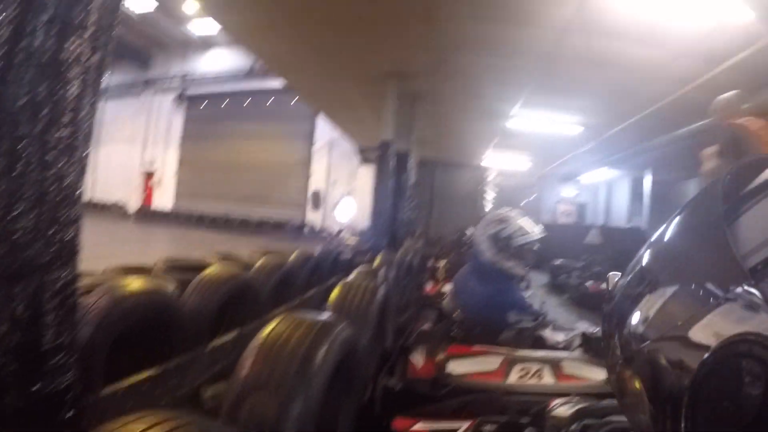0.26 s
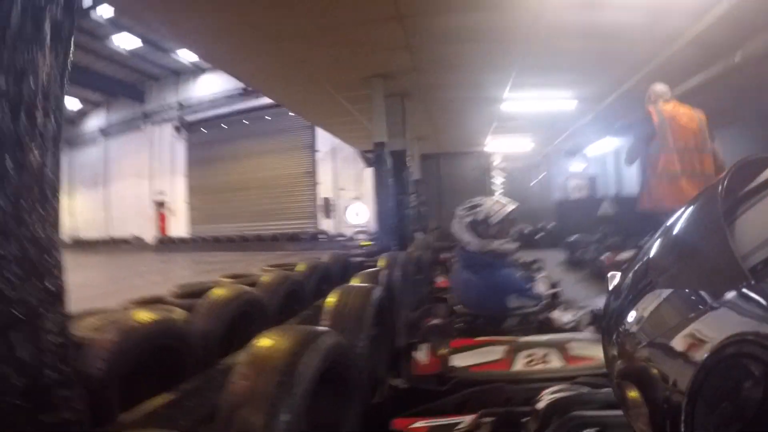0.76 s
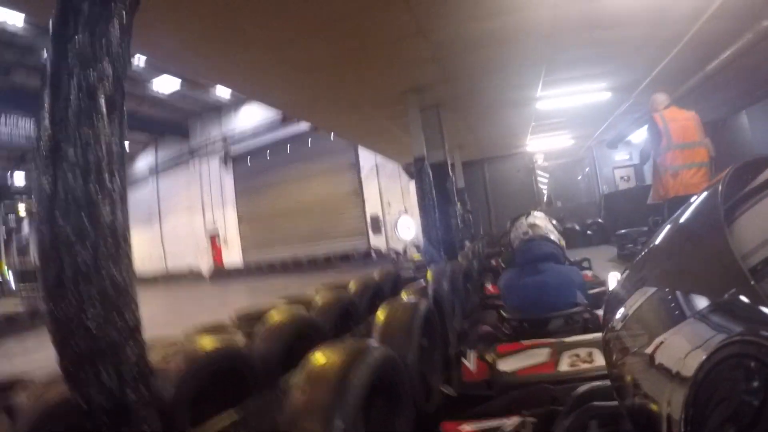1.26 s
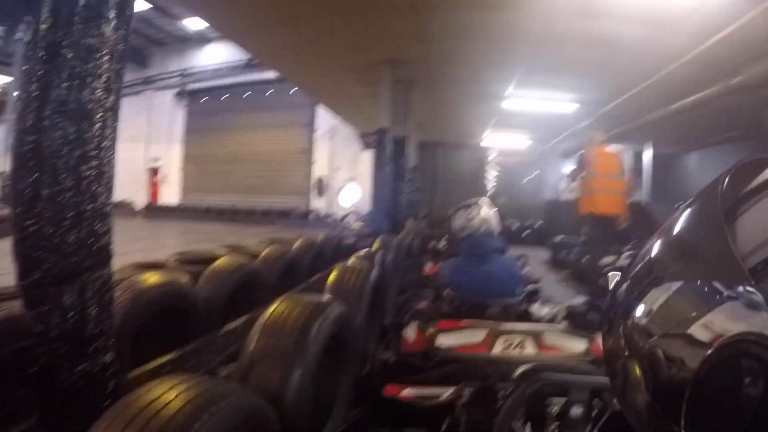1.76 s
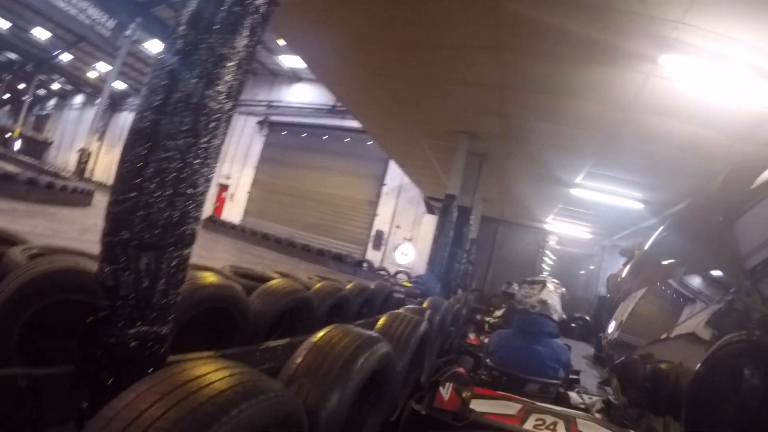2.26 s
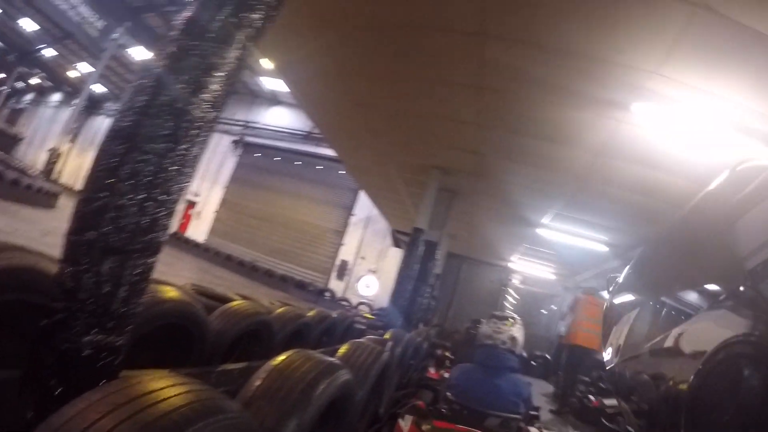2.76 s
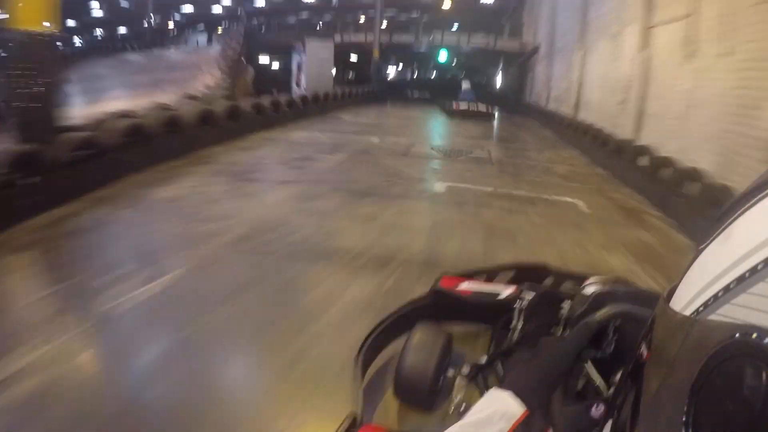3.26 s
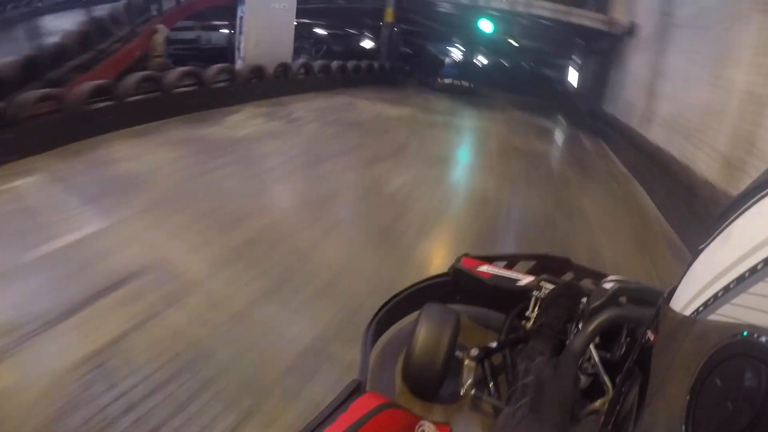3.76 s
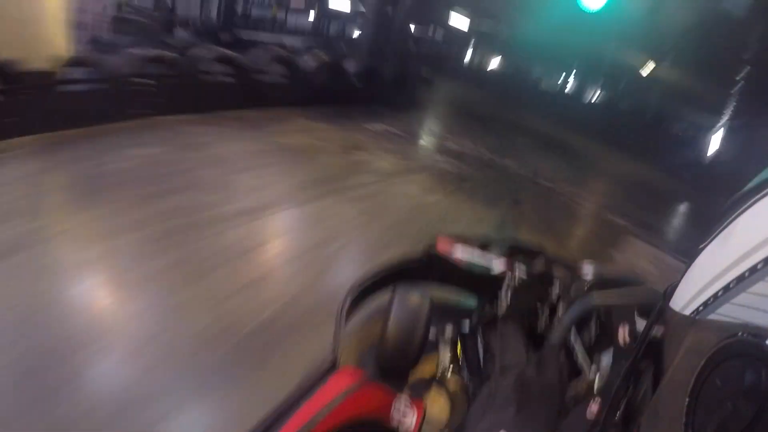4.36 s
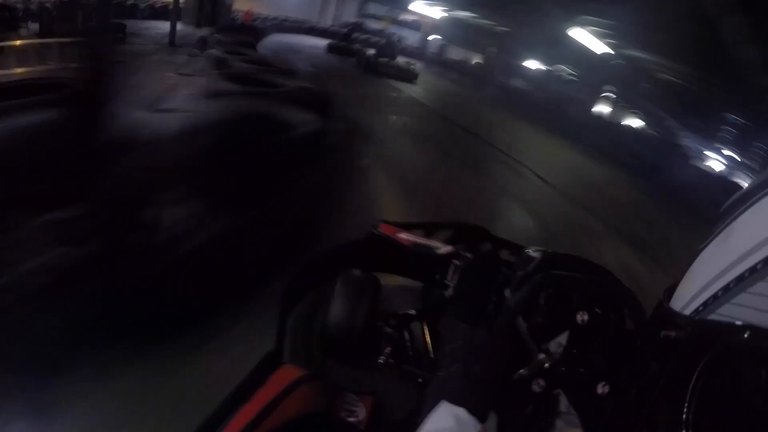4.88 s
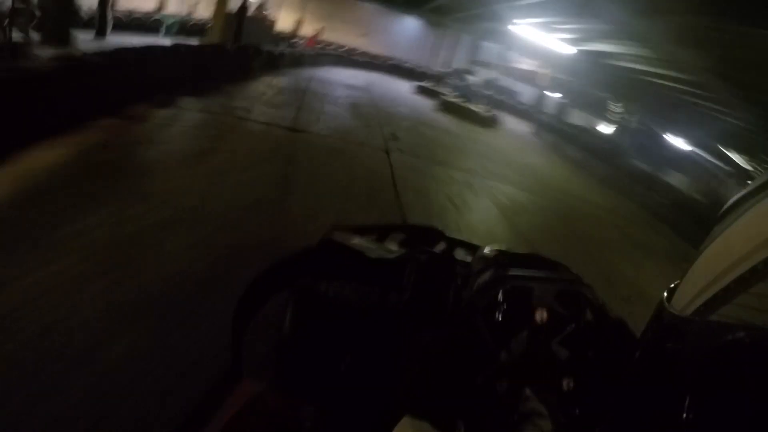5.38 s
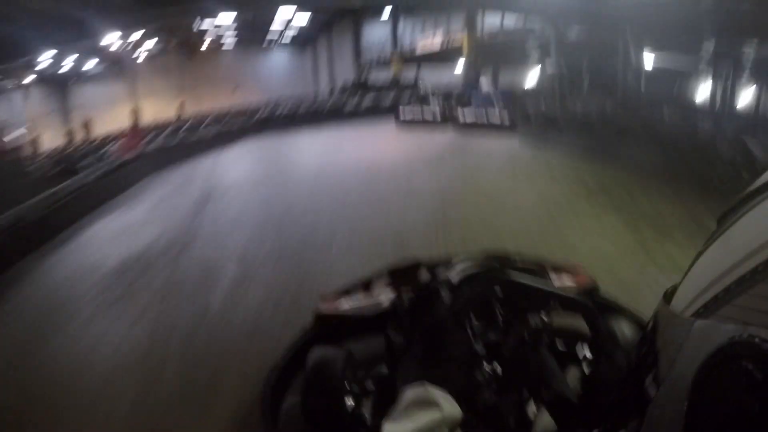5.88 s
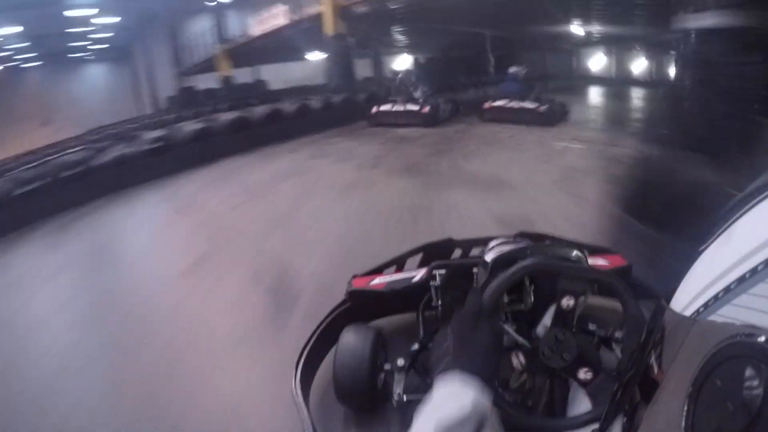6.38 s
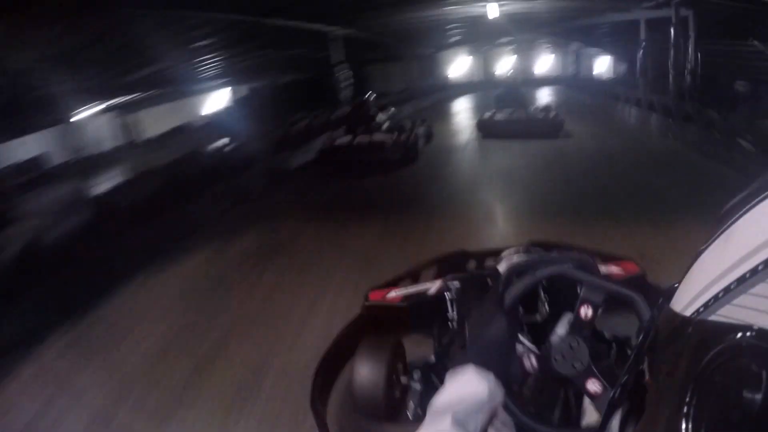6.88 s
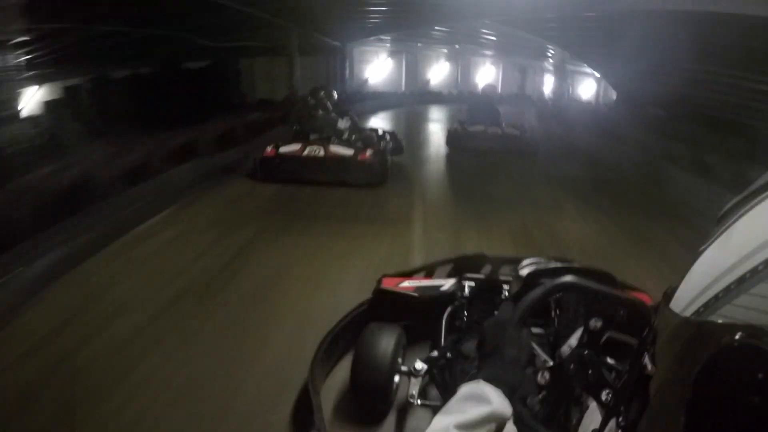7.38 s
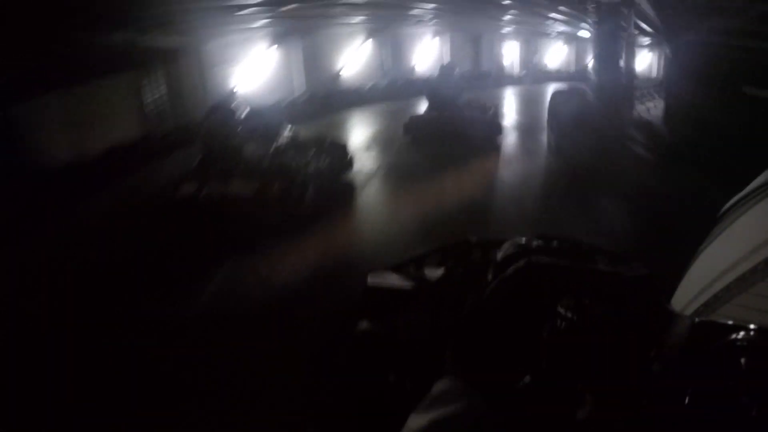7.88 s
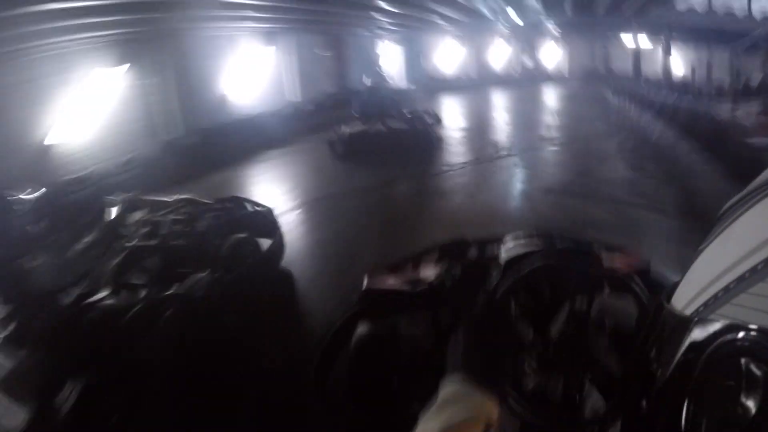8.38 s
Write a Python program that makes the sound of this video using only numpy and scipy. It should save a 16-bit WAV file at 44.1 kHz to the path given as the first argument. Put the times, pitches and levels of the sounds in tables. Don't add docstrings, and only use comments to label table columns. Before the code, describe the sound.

Muffled pit lane hum with bumps and a brief air hiss, then suddenly a droning kart at speed, wind whistling and tyres chirping.

```python
import sys
import numpy as np
from scipy import signal
from scipy.fft import rfft, irfft
from scipy.io import wavfile
from scipy.ndimage import uniform_filter1d

SR = 44100
rng = np.random.default_rng(int(sys.argv[2]) if len(sys.argv) > 2 else 0)


def field_ratio(decibels):
    return 10 ** (np.asarray(decibels, dtype=float) / 20)


def pcm_store(signal):
    levels = np.round(np.clip(np.atleast_2d(signal), -1, 1) * 32767)
    wavfile.write(sys.argv[1], SR, levels.astype(np.int16).T)


N = 381024
CUT_S = 3.141


def evened(x):
    return x / np.sqrt(np.mean(x ** 2) + 1e-20)


def curves(rows):
    s, *columns = np.transpose(rows)
    return [np.interp(np.arange(N) / SR, s, c) for c in columns]


def add(mix, start_s, sound):
    part = mix[round(start_s * SR):][:len(sound)]
    part += sound[:len(part)]


def drift(hz):
    size = N // 128 + 1
    z = rfft(rng.standard_normal(size))
    bin_hz = np.arange(len(z)) * SR / N
    slow = irfft(z * np.exp(-(bin_hz / hz) ** 2), size)
    return np.interp(np.linspace(0, size - 1, N), np.arange(size), evened(slow))


def noise(colour, patchy_db, flicker_db, size=N):
    frames, hz = size // 256 + 5, np.fft.rfftfreq(1024, 1 / SR)
    real, imag, patches = rng.standard_normal((frames, 513, 3)).T
    patches = uniform_filter1d(patches, 14, axis=0)
    patches = evened(uniform_filter1d(patches, 12, axis=1))
    flicker = evened(uniform_filter1d(rng.standard_normal(frames), size=4))
    f, db = np.transpose(colour)
    shape_db = np.interp(np.log(hz + 1), np.log(f + 1), db)[:, None]
    z = (real + 1j * imag) * field_ratio(shape_db + patchy_db * patches + flicker_db * flicker)
    return evened(signal.istft(z, nperseg=1024, noverlap=768)[1][:size])


def whistle(hz, width_hz, size=N):
    coarse = np.arange(0, size + 8, 8)
    r = np.exp(-8 * np.pi * width_hz / SR)
    slow = signal.lfilter([1], np.convolve([1, -r], [1, -r]), rng.standard_normal((2, len(coarse))))
    a, b = (np.interp(np.arange(size), coarse, part) for part in slow)
    phase = 2 * np.pi * np.cumsum(hz * np.ones(size)) / SR
    return evened(a * np.cos(phase) + b * np.sin(phase))


# pitch_hz, level_db (per Hz)
HALL_COLOUR = [(150, -37), (250, -10.5), (287, -14), (456, -18), (497, -17), (1040, -12.5), (1260, -18.5),
               (1490, -8), (1800, -14), (2540, -8), (3120, -18.5), (3900, -9), (4390, -21.5),
               (10000, -35.5), (15100, -48)]


def hall_roar():
    return field_ratio(-39.5) * noise(HALL_COLOUR, patchy_db=0.1, flicker_db=0.73)


# pitch_hz, level_db (per Hz)
RUMBLE_COLOUR = [(56, -34), (95, 5), (102, -2), (135, 2), (178, -2), (210, -6), (253, -14), (400, -27),
                 (520, -51), (880, -120)]
# pitch_hz, width_hz, level_db
IDLE_HUMS = [(69.6, 11.4, 2.5), (42.3, 15, -5), (142.9, 19, -7.5), (180, 16.4, -6.5)]


def idling_karts():
    fading_db = 4 * np.exp(-np.arange(N) / SR / 0.9)
    out = field_ratio(-36.5 + fading_db) * noise(RUMBLE_COLOUR, patchy_db=3.0, flicker_db=1.4)
    for hz, width_hz, db in IDLE_HUMS:
        out += field_ratio(-36.5 + db) * whistle(hz, width_hz)
    return out


# pitch_hz, level_db (per Hz)
PUFF_COLOUR = [(600, -31), (1500, -3), (2800, -21), (3800, 1.5), (4700, -20), (9500, -33), (14000, -38),
               (14900, -24), (15400, -40)]


def air_puff():
    start_s, level_db, t60_s, rise_s = 0.768, -27, 0.21, 0.003
    out = np.zeros(N)
    t = np.arange(SR // 4) / SR
    shape = field_ratio(level_db - 60 * t / t60_s) * (1 - np.exp(-t / rise_s))
    add(out, start_s, shape * noise(PUFF_COLOUR, 0.34, 0.25, len(t)))
    return out


def pit_lane():
    return hall_roar() + idling_karts() + air_puff()


# time_s (a quarter of the way in), level_db, pitch_hz, length_s
SQUEAKS = [
    (6.923, -31, 7200, 0.02),
    (7.0668, -32, 6630, 0.015),
    (7.117, -35, 7470, 0.018),
    (7.173, -27, 7540, 0.015),
    (7.1751, -24, 6500, 0.023),
    (7.26, -29, 7470, 0.0144),
    (8.467, -27, 6670, 0.014),
    (8.617, -23, 6790, 0.015),
]


def squeaks():
    out = np.zeros(N)
    for s, db, hz, length_s in SQUEAKS:
        size = round(length_s * SR)
        add(out, s - length_s / 4, field_ratio(db - 5.0) * np.hanning(size) * whistle(hz, 451, size))
    return out


# start_s, length_s, level_db, pitch_hz
SHAKES = [(.0, 0.14, -27, 27.1), (0.168, 0.11, -24, 27.9), (0.384, 0.51, -28.5, 29.03),
          (1.19, 0.26, -22, 26.44), (1.48, 0.086, -15, 26.3), (1.66, 0.16, -23.5, 27),
          (1.836, 0.45, -18, 29), (2.326, 0.81, -20.5, 29), (3.197, 0.1, -25, 25.3),
          (3.426, 0.18, -22, 23.6), (3.618, 0.18, -21.5, 28.1), (3.9, 0.11, -25, 30.5),
          (4.016, 0.2, -18.5, 24.98), (4.274, 0.087, -18, 25.1), (4.425, 0.15, -17.5, 25.2),
          (4.846, 0.3, -25.5, 28.36), (5.095, 0.12, -17, 23.8), (5.285, 0.15, -21, 22.5),
          (5.595, 0.28, -21.5, 22.4), (5.838, 0.27, -19.5, 23.25), (6.142, 0.17, -20.5, 23.2),
          (6.295, 0.23, -16.5, 23.14), (6.572, 0.21, -17, 22.28), (6.884, 0.39, -23.5, 24.8),
          (7.41, 0.39, -16, 25), (7.837, 0.22, -18, 24.9), (8.076, 0.1, -18.5, 24.2),
          (8.245, 0.16, -25, 23.7), (8.437, 0.22, -15, 23.4)]


def mount_sway():
    rise_s, fall_s = 0.055, 0.087
    out = field_ratio(-31) * whistle(27, 3.8)
    for s, length_s, db, hz in SHAKES:
        t = np.arange(0, length_s + fall_s, 1 / SR)
        ramp = np.clip(np.minimum(t / rise_s, (t[-1] - t) / fall_s), 0, 1)
        shape = np.sin(np.pi / 2 * ramp) ** 2
        add(out, s, field_ratio(db) * np.sqrt(2) * shape * np.sin(2 * np.pi * hz * (s + t)))
    return out


# start_s, level_db (peak), pitch_hz, t60_s
THUMPS = [
    (.149, -13.5, 72.4, 0.19),
    (.479, -28, 60, .12),
    (1.293, -16, 70.5, 0.23),
    (1.298, -19, 328, 0.031),
    (1.492, -8, 71.7, 0.12),
    (1.521, -10.5, 71, 0.21),
    (6.326, -5, 69, 0.13),
    (6.631, -8, 64.7, .13),
    (7.307, -25, 94, 0.11),
    (8.609, -8, 77, .12),
]


def thumps():
    out = np.zeros(N)
    t = np.arange(SR // 4) / SR
    for s, db, hz, t60_s in THUMPS:
        ring = field_ratio(db - 60 * t / t60_s) * np.sin(2 * np.pi * hz * t)
        add(out, s, ring * (1 - np.exp(-t / 0.0061)))
    return out


# start_s, level_db (peak)
RAPS = [
    (0.151, -36),
    (0.780, -27.5),
    (3.262, -21),
    (3.68, -15),
    (6.3158, -3),
    (6.622, -12.5),
    (8.611, -11),
]
# pitch_hz, level_db, t60_s
SHELL_MODES = [(890.4, 2.5, 0.023), (1474, 3.5, 0.017), (1573, -7, 0.033), (2220, -2.5, 0.026),
               (635, -1, 0.023), (400, 0.5, 0.021), (250, 1.5, 0.026)]


def raps():
    out = np.zeros(N)
    t = np.arange(SR // 4) / SR
    for s, db in RAPS:
        ring = np.zeros(len(t))
        for hz, mode_db, t60_s in SHELL_MODES:
            detuned_hz = hz * rng.uniform(1.0, 1.01)
            ring += field_ratio(mode_db - 60 * t / t60_s) * np.sin(2 * np.pi * detuned_hz * t)
        add(out, s, field_ratio(db - 1.0) * ring * (1 - np.exp(-t / 0.0016)))
    return out


# time_s, air_speed_db, throttle (0-1), closeness of the karts ahead (0-1)
DRIVE = [(3.14, -2.5, 0, 0.1), (3.5, -2.5, 0, 0), (3.75, -1.5, 0.7, 0.24), (3.95, -1.5, 0.76, 0.06),
         (4.3, -1, .9, 0.03), (4.85, 0.3, 0.2, 0.11), (5.2, 0.4, 0.55, 0.1), (5.5, 0.5, 0.72, 0.24),
         (6.0, -.5, 0.78, 0.39), (6.35, 0.25, 0.65, 0.38), (6.65, -1.5, 0.4, 0.21), (6.9, -0.5, .2, 0.52),
         (7.15, 0, 0.1, 0.86), (7.4, 1, 0.9, 0.42), (7.8, 0.75, 0.4, 0.38), (8.2, 1.5, 0.85, 0.48),
         (8.5, 1.5, 0.8, 0.92), (8.64, 2, 0.5, 0.7)]


def driven(level_db, speed_share, throttle_db, alongside_db):
    speed_db, throttle, close = curves(DRIVE)
    return field_ratio(level_db + speed_share * speed_db + throttle_db * throttle + alongside_db * close)


def karts_ahead():
    close = curves(DRIVE)[2]
    scrub = field_ratio(-43.5 + 14.5 * close) * whistle(3150, 902)
    rival_hz = 903
    rival = whistle(rival_hz, 110) + 0.51 * whistle(2 * rival_hz, 90)
    return scrub + driven(-49.5, 1.7, 10, 5) * rival


def port_whistle():
    return driven(-28, 1.8, -0.3, 8) * field_ratio(0.93 * drift(hz=24)) * whistle(3890, 530)


# pitch_hz, level_db (per Hz)
HISS_COLOUR = [(2590, -25), (4400, -6), (5350, -4.5), (5820, -6.5), (7190, -12), (7690, -17), (8480, -15),
               (11900, -26.5), (14300, -32), (15100, -38)]


def wind_hiss(throb):
    speed_db = curves(DRIVE)[0]
    hiss = noise(HISS_COLOUR, patchy_db=0.6, flicker_db=0.77)
    hiss = hiss + 0.064 * speed_db * np.diff(hiss, prepend=0)
    return driven(-34.5, 1.2, -0.5, 2.3) * field_ratio(0.47 * drift(hz=45)) * hiss * throb ** 0.88


# pitch_hz, level_db (per Hz)
RUSH_COLOUR = [(24, -31), (45, -3), (125, -20), (200, -6), (300, -17.5), (480, -18.5), (713, -19),
               (914, -14), (1260, -19.5), (2000, -17), (2530, -16.5), (3090, -28.5), (3860, -24.5),
               (4600, -36)]


def rush_and_chain(firing_hz, throb):
    colour = list(RUSH_COLOUR) + [(6000, -51)]
    rush = driven(-22.6, 1.13, -0.4, 1.5) * noise(colour, patchy_db=0.44, flicker_db=.5)
    mesh = driven(-29.5, 1.5, -3, -15) * whistle(28 * firing_hz, 55)
    return (rush + mesh) * throb


def chain_whine(firing_hz):
    close = curves(DRIVE)[2]
    bracket = 0.92 * (1 - close) * whistle(1925, 85)
    return driven(-47.5, 1.1, 18, 2) * (whistle(56 * firing_hz, 59) + bracket)


# time_s, rate_hz (firings a second)
REVS = [(3.14, 30.1), (3.5, 31.1), (3.9, 33.4), (4.3, 34.5), (4.75, 36.1), (5.1, 35.6), (5.55, 34.65),
        (6.0, 35.65), (6.5, 36.0), (7.05, 36.8), (7.65, 35.9), (8.2, 38.0), (8.64, 38.8)]


def firing_rate():
    return curves(REVS)[0] * (1 + .003 * drift(hz=6))


# multiple of the firing rate, level_db
FIRING_ORDERS = [(1, -12), (2, 3), (3, -4), (4, -2), (5, -3), (6, -0.5), (7, -8), (8, -12), (9, -14),
                 (10, -10), (11, -16), (12, -19), (13, -18), (14, -21), (15, -19), (16, -17), (17, -19),
                 (18, -21), (19, -23), (20, -24)]


def engine(turns):
    edge_lead = 0.8
    out = np.zeros(N)
    for k, db in FIRING_ORDERS:
        waver_db = min(.8 + .22 * k, 3) * drift(hz=4)
        level_db = db + waver_db - 2.5 * (k > 7)
        phase = edge_lead + (.25 + .04 * k) * drift(hz=1.5 + .2 * k)
        out -= field_ratio(level_db) * np.sin(2 * np.pi * k * turns + phase)
    return driven(-21.5, 1.06, -0.76, 0) * evened(out)


def track():
    firing_hz = firing_rate()
    turns = np.cumsum(firing_hz) / SR
    throb = evened(1 + .42 * np.exp(-(turns % 1) / .25))
    out = karts_ahead() + port_whistle() + wind_hiss(throb)
    out += rush_and_chain(firing_hz, throb) + chain_whine(firing_hz)
    return out + engine(turns)


def scene():
    racing = np.clip((np.arange(N) / SR - CUT_S) / .001, 0, 1)
    places = pit_lane() * (1 - racing) + track() * racing
    return (places + squeaks() + mount_sway() + thumps() + raps())[None]


def band_limit(x):
    return signal.sosfilt(signal.butter(12, 15270, fs=SR, output="sos"), x)


def record(dry):
    mix = np.tanh(dry * 0.81) / 0.79
    return band_limit(mix)


dry = scene()
out = record(dry)
pcm_store(out)
```